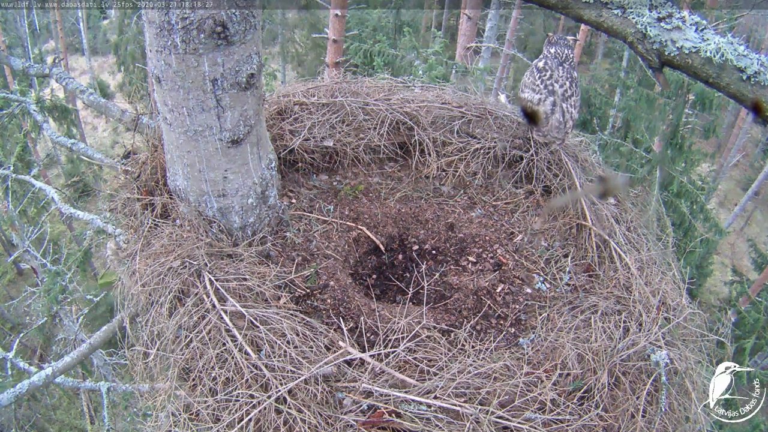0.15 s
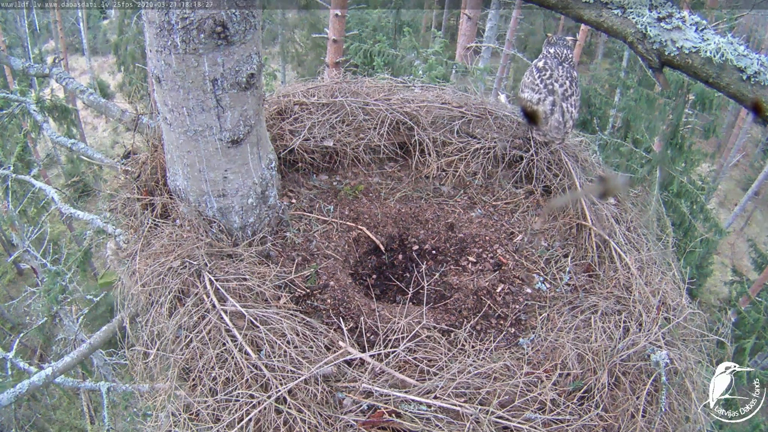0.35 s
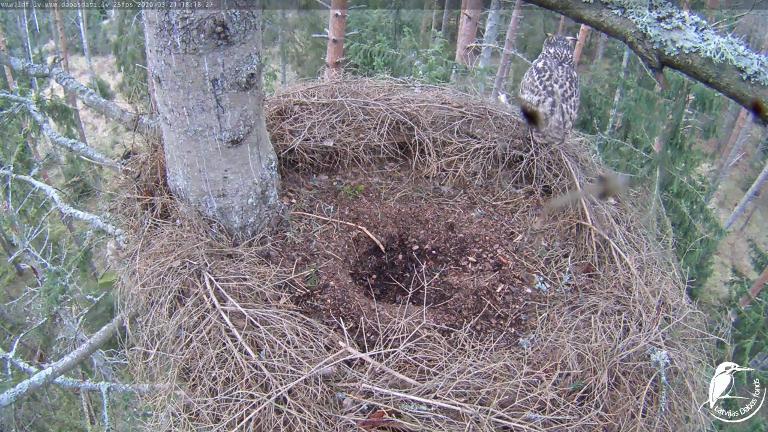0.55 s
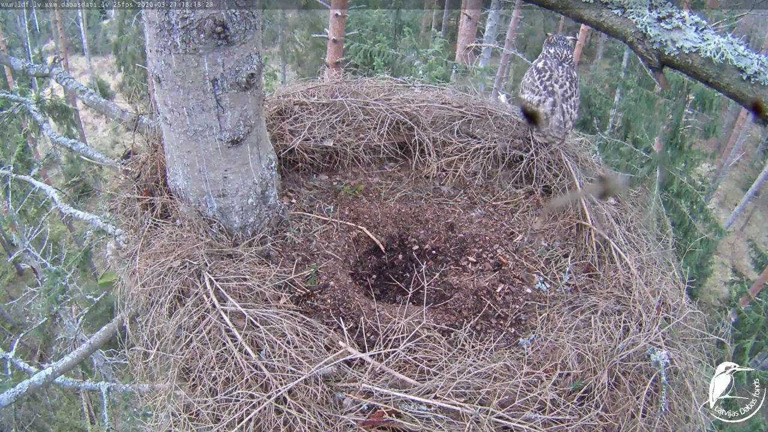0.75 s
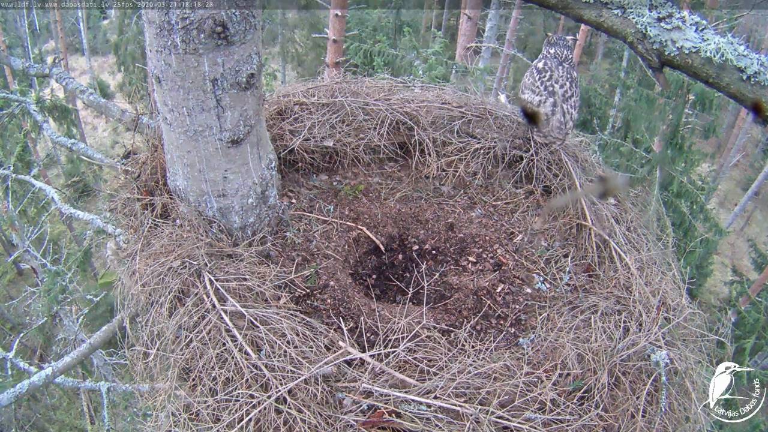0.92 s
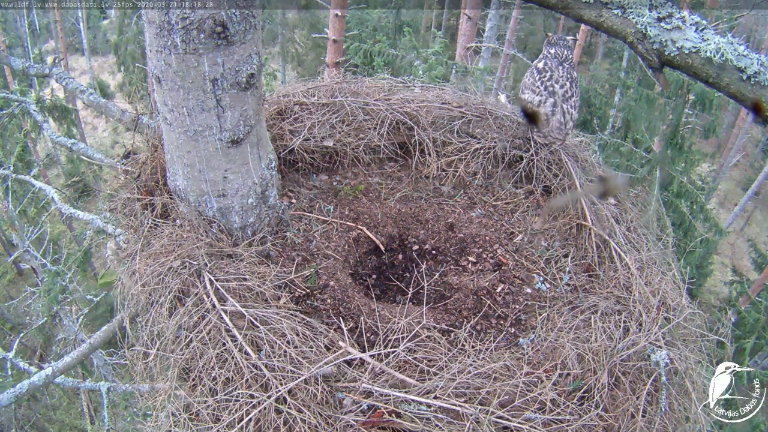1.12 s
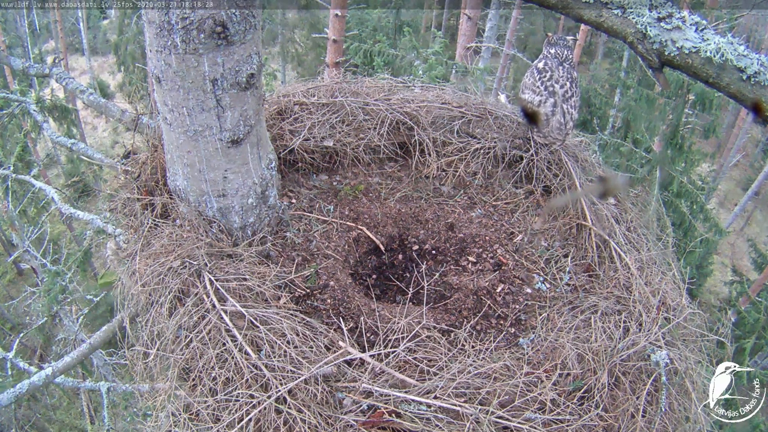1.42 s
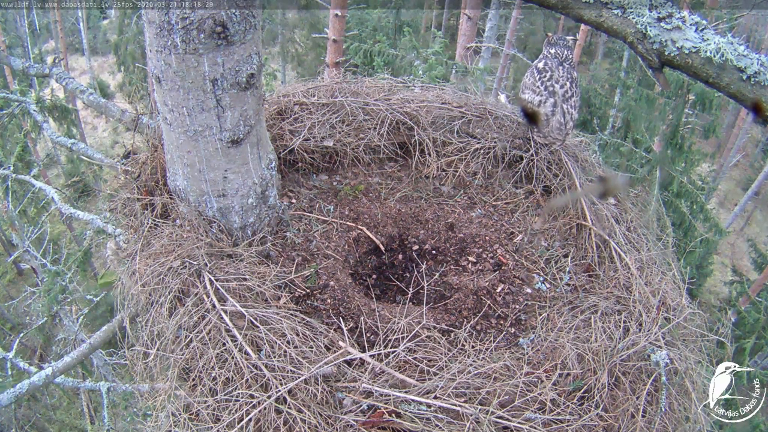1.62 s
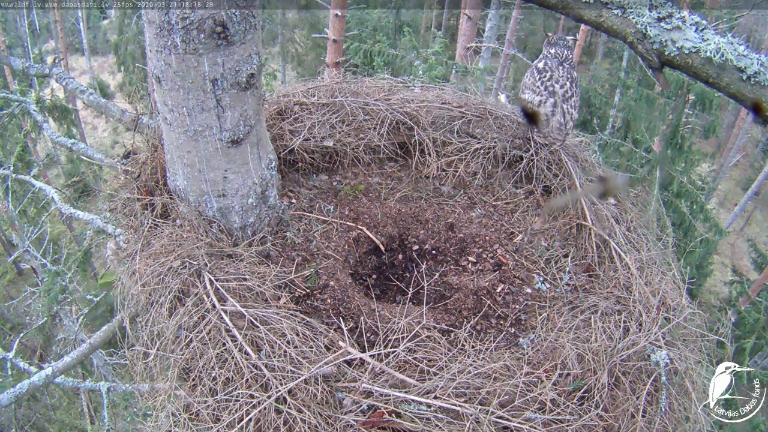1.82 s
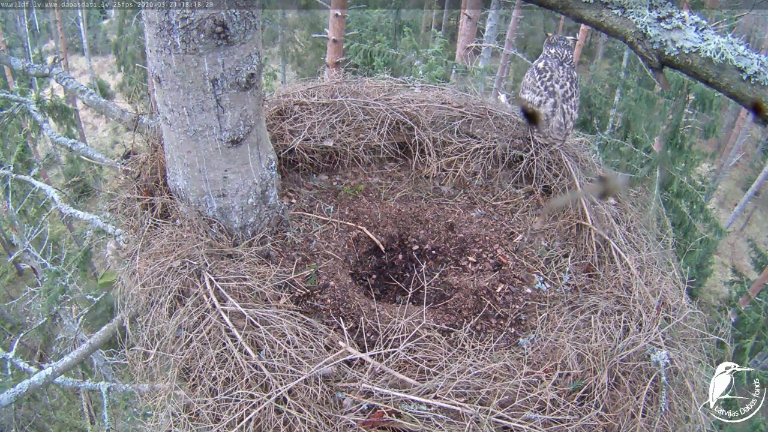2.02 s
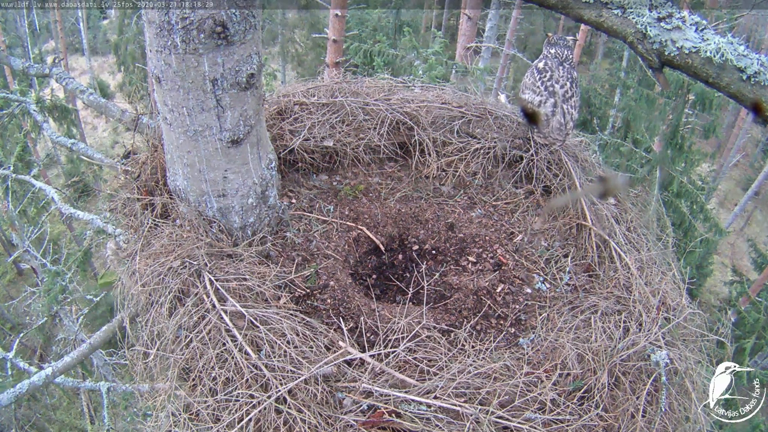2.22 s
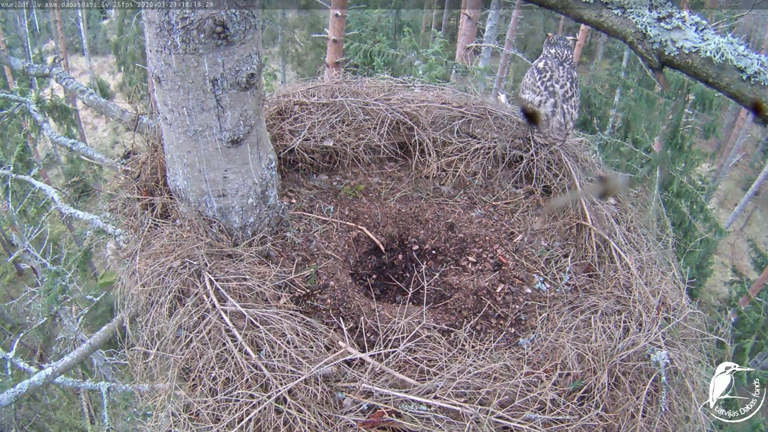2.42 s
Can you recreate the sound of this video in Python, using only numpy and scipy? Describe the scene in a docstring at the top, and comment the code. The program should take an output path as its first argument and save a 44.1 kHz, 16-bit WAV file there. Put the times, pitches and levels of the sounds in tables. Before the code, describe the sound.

An owl gives one low hoot in a forest, over a faint steady hiss.

```python
"""A forest: an owl on the rim of a stick nest gives one low hoot, a quick rise, a level hold, then a
soft falling tail. The voice is a nearly pure tone, its faint upper harmonics coloured by the throat.
The trunks around answer it with echoes that flicker in the moving air. A steady hiss, slow wind
on the microphone and a faint whine of the electronics lie under it."""
import sys
import numpy as np
from scipy import signal
from scipy.fft import rfft, irfft, next_fast_len
from scipy.io import wavfile
from scipy.ndimage import uniform_filter1d, map_coordinates

SR = 44100
rng = np.random.default_rng(int(sys.argv[2]) if len(sys.argv) > 2 else 0)


def store_wav(level_fs):
    """Save 16-bit WAV to argv[1]."""
    pcm = np.round(np.clip(np.atleast_2d(level_fs), -1, 1) * 32767)
    wavfile.write(sys.argv[1], SR, pcm.T.astype(np.int16))


N = 112454

# Tone of the steady hiss: frequency_hz, gain_db
HISS_SPECTRUM = [(20, -9), (65, -16), (100, -15), (150, -17.5), (250, -22.5), (400, -27), (600, -25.5),
                 (1000, -28.5), (3000, -30), (3950, -30), (4100, -33.5), (6300, -35), (7000, -38.5),
                 (7500, -49), (7900, -67.5), (15500, -68)]
# Tone of the wind rumble: frequency_hz, gain_db
WIND_SPECTRUM = [(1, -2), (4, 1.5), (15, -8), (22, -6.5), (30, -18), (60, -34), (120, -77.5)]
# Swells and lulls of the wind: time_s, level_db
WIND_GUSTS = [(0.0, -63), (0.23, -71), (0.52, -56.5), (1.16, -67), (1.3, -53.5), (1.45, -78), (1.65, -57),
              (1.74, -70), (1.79, -55.5), (1.87, -64), (1.92, -51), (2.37, -68), (2.44, -56.5), (2.55, -73)]
# Drift of the electronic whine: time_s, pitch_hz
WHINE_PITCH = [(0, 6326), (.45, 6332), (.85, 6327), (1.05, 6339), (1.6, 6334), (1.95, 6342), (2.1, 6331),
               (2.55, 6334)]
# Reverb tails off the near and far trees: start_s, t60_s, gain_db
TREE_TAILS = [(.06, .6, -30), (.3, 4, -37)]
# Distinct echoes off single trunks and the forest edge: delay_s, gain_db
TRUNK_ECHOES = [(.125, -30), (.165, -23), (.36, -35), (0.471, -35), (.6, -37), (1.322, -46), (1.601, -49)]
# How well the trunks return each frequency: frequency_hz, gain_db
TRUNK_RESPONSE = [(250, -10), (310, -7), (390, -13), (425, 0), (900, 0), (3000, -6)]
# Contour of the hoot: time_s, pitch_hz, fundamental_db, second_harmonic_db, upper_harmonics_db
HOOT_CONTOUR = [(.168, 159.4, -73, -74.5, -83.5), (.178, 201.2, -65, -66, -74.5),
                (.186, 240, -53.5, -59.5, -74), (.194, 317.6, -50, -57.5, -74.5),
                (.202, 330, -39.5, -49, -77.5), (.21, 353, -37.5, -48, -72.5),
                (0.219, 373.4, -32.5, -53.5, -64), (.226, 412, -33, -58, -75),
                (0.235, 431.4, -34, -60, -65), (.25, 438.6, -34, -62, -65.5), (.29, 432, -33, -59.5, -62),
                (.33, 423.1, -31.8, -57, -63), (.39, 428.4, -32.5, -58, -65), (.42, 437.2, -34, -60.5, -66),
                (.445, 428.8, -33, -62.5, -67), (0.475, 396, -33, -55, -66.5), (.49, 369, -35, -56, -70.5),
                (.506, 331.6, -38.5, -55.5, -78), (.522, 301, -46, -58, -76),
                (0.576, 301.3, -42.5, -61, -75.5), (.618, 287.4, -49, -61, -79),
                (.66, 271.7, -50, -59.5, -75.5), (0.709, 241.6, -54, -63, -77),
                (0.753, 212.4, -56.5, -70, -80), (.785, 173.2, -66.5, -82, -88),
                (.82, 123.7, -78, -90, -95)]
# Balance of the upper harmonics ahead of the throat: harmonic_number, gain_db
UPPER_HARMONICS = [(3, 1), (4, -1.5), (5, -0.5), (6, -7)]
# Colour the throat gives the upper harmonics: frequency_hz, gain_db
THROAT_RESPONSE = [(650, 5.5), (900, 1), (1050, 1.5), (1150, -2.5), (1290, 0), (1560, -21.5), (1720, 2),
                   (1880, -5.5), (1990, 1.5), (2150, 6.5), (2400, -2), (2570, 3), (2800, -5.5)]

TIME_S = np.arange(N) / SR


def amp(db):
    """Decibels to linear gain."""
    return 10 ** (np.asarray(db) / 20)


def eq_db(curve, hz):
    """The gain of an EQ curve at hz, its points joined on a log frequency axis."""
    points_hz, gains_db = np.transpose(curve)
    return np.interp(np.log(hz + 1), np.log(points_hz + 1), gains_db)


def wobble(rate_hz):
    """A smooth random modulator with rate_hz random points a second."""
    points = rng.standard_normal(int(N * rate_hz / SR) + 4)
    return map_coordinates(points, [TIME_S * rate_hz])


def filtered(x, response):
    """Zero-phase EQ; response gives the linear gain at each frequency."""
    size = next_fast_len(N + SR // 2)
    hz = np.fft.rfftfreq(size, 1 / SR)
    return irfft(rfft(x, size) * response(hz), size)[..., :N]


def noise(spectrum):
    """Coloured noise at an rms of 1."""
    coloured = filtered(rng.standard_normal(N), lambda hz: amp(eq_db(spectrum, hz)))
    return coloured / np.sqrt(np.mean(coloured ** 2) + 1e-20)


def hiss(level_db=-59):
    """The bed: steady broad noise, weighted to the low end."""
    return amp(level_db) * noise(HISS_SPECTRUM)


def wind():
    """Gusts on the microphone: a deep rumble that swells and sinks."""
    level_db = np.interp(TIME_S, *np.transpose(WIND_GUSTS))
    return amp(level_db) * noise(WIND_SPECTRUM)


def electronics_whine(tone_db=-83.5, sub_octave_db=-87):
    """A thin drifting tone from the electronics, with a softer one an octave under it."""
    pitch_hz = np.interp(TIME_S, *np.transpose(WHINE_PITCH))
    phase = 2 * np.pi * np.cumsum(pitch_hz) / SR
    return np.sqrt(2) * (amp(tone_db) * np.sin(phase) + amp(sub_octave_db) * np.sin(phase / 2))


def forest_echoes(voice, flicker_db=2):
    """The trunks return a few clear echoes on scattered tails, flickering in the moving air."""
    impulse_response = np.zeros(N)
    for start_s, t60_s, gain_db in TREE_TAILS:
        tail = rng.standard_normal(N) * amp(-60 * TIME_S / t60_s) * (TIME_S > start_s)
        impulse_response += amp(gain_db) * tail / np.linalg.norm(tail)
    for delay_s, gain_db in TRUNK_ECHOES:
        impulse_response[round(delay_s * SR)] += amp(gain_db)
    wet = signal.fftconvolve(voice, impulse_response)[:N]
    wet = filtered(wet, lambda hz: amp(eq_db(TRUNK_RESPONSE, hz)))
    return amp(flicker_db * wobble(rate_hz=14.17)) * wet


def harmonic(phase, level_db, shimmer_db=1):
    """One overtone of the voice, with a slight shimmer in level."""
    envelope = amp(level_db + shimmer_db * wobble(rate_hz=50))
    return envelope * np.sin(phase + rng.uniform(0, 2 * np.pi))


def owl_hoot(jitter_hz=1, rough_db_per_db=.08, side_offset_hz=94, side_gain_db=-33.5):
    """A nearly pure fundamental with a weak second harmonic; the upper harmonics pass the throat."""
    times_s, contour_hz, *levels_db = np.transpose(HOOT_CONTOUR)
    glide_hz = uniform_filter1d(np.interp(TIME_S, times_s, contour_hz), size=300)
    pitch_hz = glide_hz + jitter_hz * wobble(rate_hz=60)
    phase = 2 * np.pi * np.cumsum(pitch_hz) / SR
    fundamental_db, second_db, upper_db = [
        np.interp(TIME_S, times_s, db, left=-120, right=-120) for db in levels_db]
    # The hoot's fading tail sounds rougher, as if beating against its own reverb.
    rough_db = rough_db_per_db * (fundamental_db.max() - fundamental_db) * wobble(rate_hz=45)
    # A faint side tone rides just above the fundamental.
    side_tone = amp(side_gain_db) * np.sin(phase + 2 * np.pi * side_offset_hz * TIME_S)
    voice = amp(fundamental_db + rough_db) * (np.sin(phase) + side_tone)
    voice += harmonic(2 * phase, second_db)
    for number, gain_db in UPPER_HARMONICS:
        throat_db = eq_db(THROAT_RESPONSE, number * pitch_hz)
        voice += harmonic(number * phase, upper_db + gain_db + throat_db)
    return np.sqrt(2) * voice


def scene():
    """The mono mix: the hoot and its echoes over wind, hiss and whine."""
    hoot = owl_hoot()
    return (hoot + forest_echoes(hoot) + wind() + hiss() + electronics_whine())[None]


def record(dry, cutoff_hz=15700):
    """A brick-wall low-pass on the whole mix."""
    return filtered(dry, lambda hz: hz < cutoff_hz)


dry = scene()
out = record(dry)
store_wav(out)
```